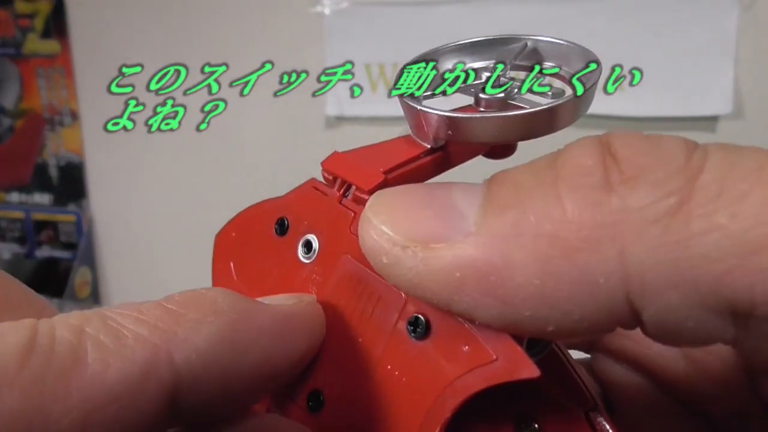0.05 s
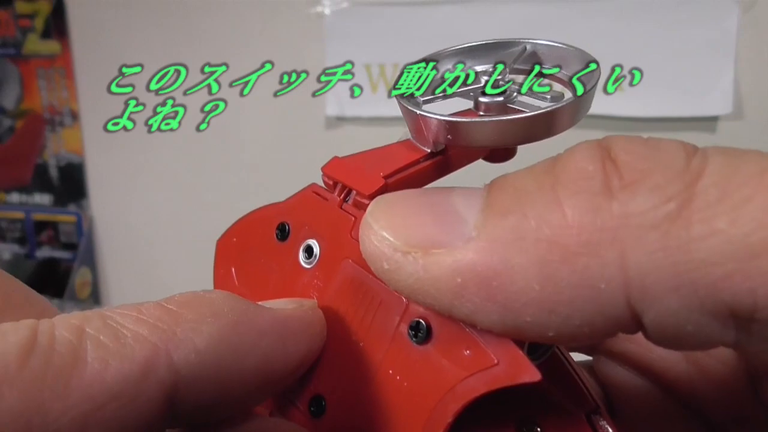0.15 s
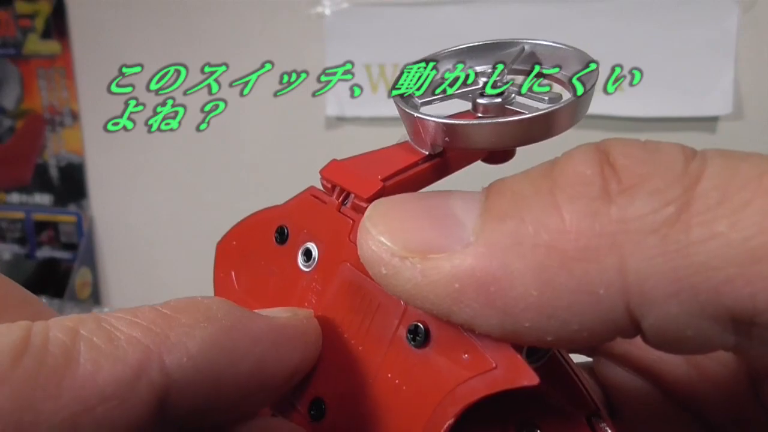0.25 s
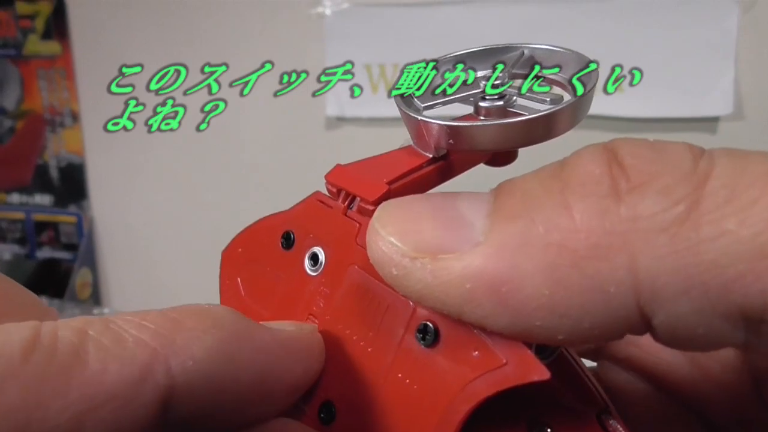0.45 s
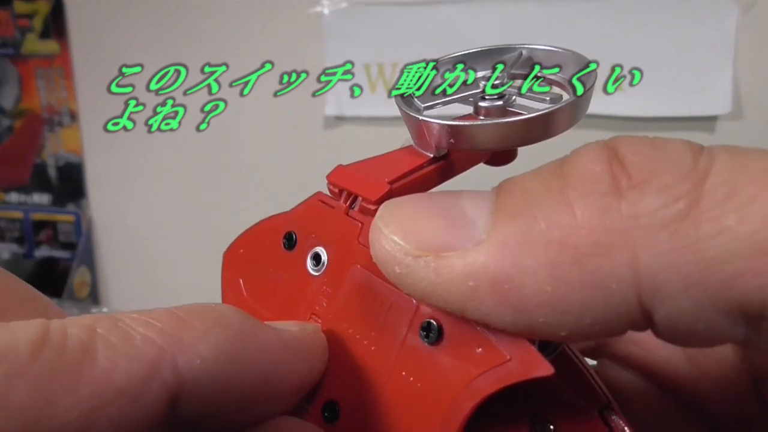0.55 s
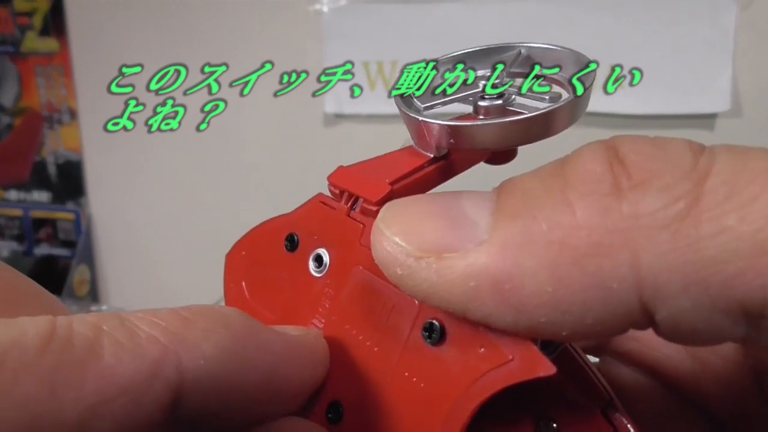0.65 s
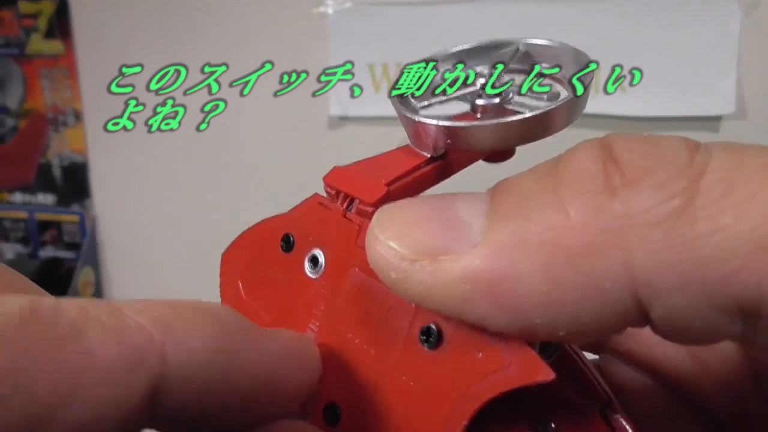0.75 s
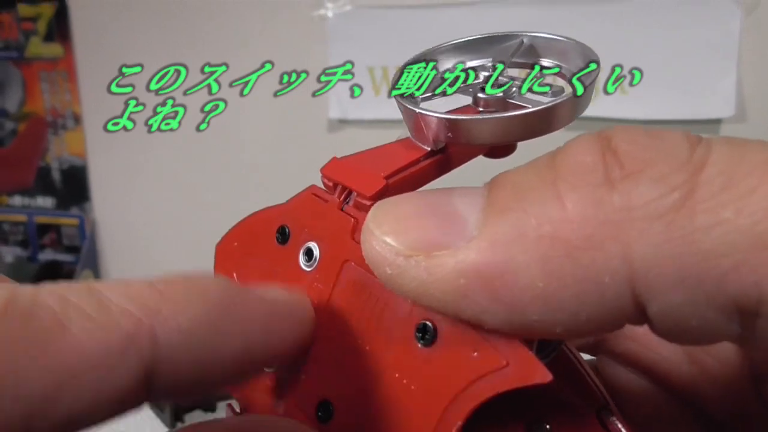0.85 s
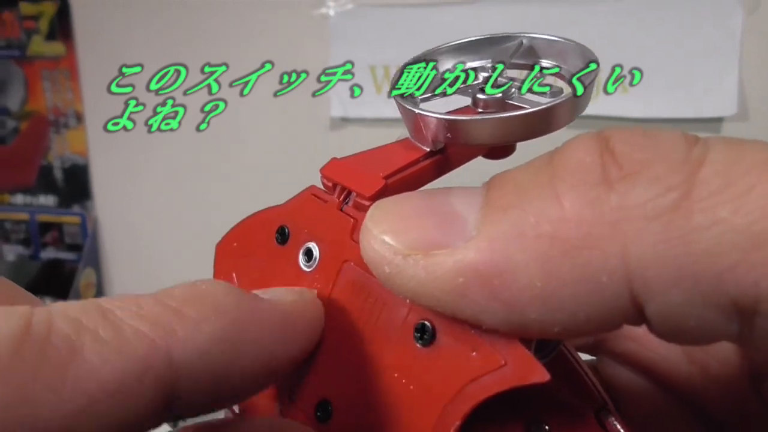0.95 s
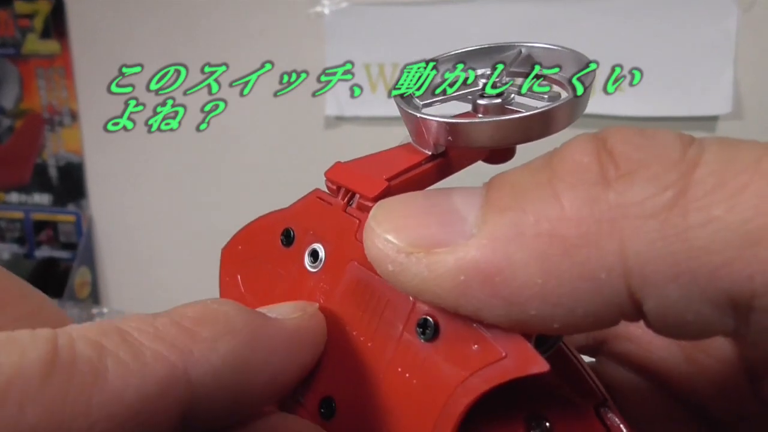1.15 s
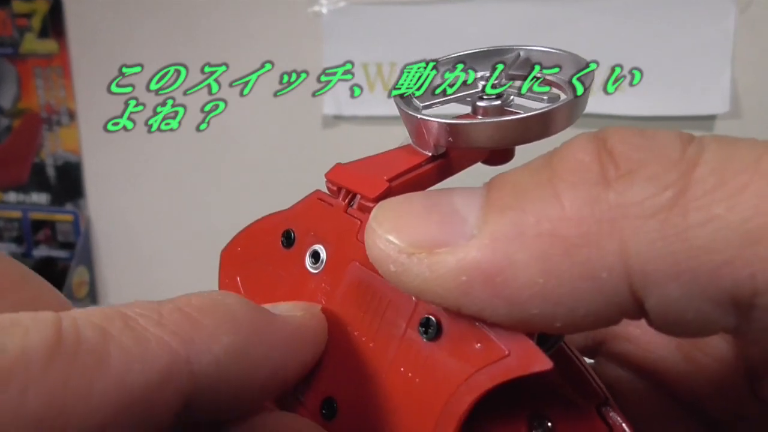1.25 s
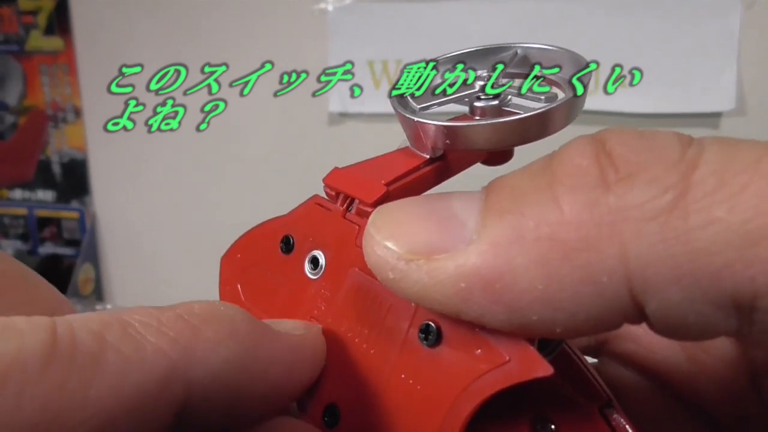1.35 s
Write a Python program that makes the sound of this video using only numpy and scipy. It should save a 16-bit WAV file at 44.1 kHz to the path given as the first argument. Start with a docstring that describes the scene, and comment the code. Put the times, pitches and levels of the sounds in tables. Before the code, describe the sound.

A stiff plastic toy switch ticks and scrapes under fingers, then snaps over loudly.

```python
"""Fingers work a stiff switch on a small hollow plastic toy, close by, over a faint fan-like hum.
A finger scrapes, and the switch sticks and slips in runs of dry ticks; each slip rings the shell
and jolts the held toy. A loose part knocks faintly. The switch snaps over twice, the second time
much louder. Light scrapes, two small knocks and a few last ticks follow in the quiet room."""
import sys
import numpy as np
from scipy import signal
from scipy.fft import rfft, irfft, next_fast_len
from scipy.io import wavfile
from scipy.ndimage import uniform_filter1d, minimum_filter1d, map_coordinates

SR = 44100
rng = np.random.default_rng(int(sys.argv[2]) if len(sys.argv) > 2 else 0)


def persist_wave(psi):
    """Save psi, clipped to +-1, as 16-bit WAV."""
    counts = np.round(np.clip(psi, -1, 1) * 32767).astype(np.int16)
    wavfile.write(sys.argv[1], SR, np.atleast_2d(counts).T)


N = 61739
ATTACK_S, HOLLOW_DB = .00012, -36


def amp(db):
    return 10 ** (np.asarray(db) / 20)


def unit_rms(x):
    return x / np.sqrt(np.mean(x ** 2) + 1e-20)


def curve_at(points, hz):
    """Interpolate (freq_hz, value) points on a log frequency axis."""
    freqs, values = np.transpose(points)
    return np.interp(np.log(hz + 1), np.log(freqs + 1), values)


def filtered(x, response):
    """Zero-phase filter with gain response(hz)."""
    n = x.shape[-1]
    size = next_fast_len(n + 2048)
    return irfft(rfft(x, size) * response(np.fft.rfftfreq(size, 1 / SR)), size)[..., :n]


def lowpass(x, edge_hz, steepness):
    return filtered(x, lambda hz: 1 / (1 + (hz / edge_hz) ** steepness))


def noise(spectrum, correlation, size):
    """Coloured stereo noise, rms 1, with a left-right correlation curve."""
    def response(hz):
        angle = np.arccos(np.clip(curve_at(correlation, hz), -1, 1)) / 2
        return amp(curve_at(spectrum, hz)) * [np.cos(angle), np.sin(angle)]
    mid, side = filtered(rng.standard_normal((2, size)), response)
    return unit_rms(np.array([mid + side, mid - side]))


def pan(left_over_right_db):
    return amp([[left_over_right_db / 2], [-left_over_right_db / 2]])


def add(track, start_s, sound):
    part = track[:, round(start_s * SR):][:, :sound.shape[-1]]
    part += sound[..., :part.shape[1]]


def ring(modes, t, detune=.008, scatter_db=1.5, stereo_rad=.25):
    """Damped stereo modes, struck a little differently each time."""
    hz, db, t60_s = np.transpose(modes)[:, :, None]
    tuning, strength, start_phase, skew = rng.standard_normal((4, len(modes), 1))
    phase = 2 * np.pi * hz * (1 + detune * tuning) * t + start_phase
    decay = amp(db + scatter_db * strength - 60 * t / t60_s)
    return np.array([(decay * np.sin(phase + side * stereo_rad * skew)).sum(0) for side in (1, -1)])


# Room air spectrum: freq_hz, gain_db
AIR_SPECTRUM = [(24, -64), (40, 4.5), (354, -0.5), (663, -5.5), (918, -5.5), (1590, -15.5), (1900, -22.5),
                (3140, -27.5), (4340, -25), (6330, -29.5), (9450, -22.5), (14500, -27.5), (16000, -60)]
# Room air stereo image: freq_hz, correlation
AIR_CORRELATION = [(60, 0.7), (1000, 0.05), (12000, 0.063)]
# Hum lines: pitch_hz, level_db
HUM_LINES = [(121, -72.5), (301, -80.5), (360.7, -67), (893.6, -74.5)]


def background(air_db=-59.5, drift_per_s=6):
    """Room air and a slightly unsteady fan-like hum."""
    t = np.arange(N) / SR
    hum = np.zeros(N)
    for hz, db in HUM_LINES:
        drift_rad = .5 * map_coordinates(rng.standard_normal(16), [t * drift_per_s])
        hum += amp(db) * np.sqrt(2) * np.sin(2 * np.pi * hz * t + drift_rad)
    return amp(air_db) * noise(AIR_SPECTRUM, AIR_CORRELATION, N) + hum


# Finger friction spectrum: freq_hz, gain_db
SCRAPE_SPECTRUM = [(160, 5), (700, -8), (2400, -18.5), (3700, -16.5), (4600, -2), (6100, -19), (8000, -5),
                   (12000, -10), (15500, -25)]
# Finger strokes: start_s, length_s, level_db
STROKES = [(0.108, 0.059, -65), (0.3, 0.034, -49.5), (0.419, 0.13, -73), (0.489, 0.017, -51),
           (0.717, 0.057, -59), (0.879, 0.14, -51.5), (1.0248, 0.031, -50.5), (1.143, 0.027, -52),
           (1.239, 0.014, -57)]


def scrapes(grains_per_s=1300, fade_db=11.5):
    """Dense tiny slips under a finger, coloured by the shell; each stroke eases off."""
    out, t = np.zeros((2, N)), np.arange(N) / SR
    grains = (rng.random(N) < grains_per_s / SR) * np.exp(.4 * rng.standard_normal(N))
    stereo_grains = grains * (1 + .5 * rng.standard_normal((2, N)))
    hiss = .1 * rng.standard_normal((2, N))
    rub = filtered(stereo_grains + hiss, lambda hz: amp(curve_at(SCRAPE_SPECTRUM, hz)) * hz / (hz + 150))
    for start_s, length_s, level_db in STROKES:
        stroke = rub[:, (t >= start_s) & (t < start_s + length_s)]
        size = stroke.shape[1]
        easing = amp(-fade_db * np.linspace(0, 1, size)) * signal.windows.tukey(size, .35)
        add(out, start_s, amp(level_db) * unit_rms(stroke) * easing)
    return out


def add_jolt(track, click_s, level_db, hz, t, lead_s=.00062, rise_s=.001, t60_cycles=.96):
    """The whole toy kicks once, just ahead of a click, damped by the fingers."""
    swing = -np.sin(2 * np.pi * hz * t) * amp(-60 * t * hz / t60_cycles)
    swing *= 1 - np.exp(-t / rise_s)
    add(track, click_s - lead_s, amp(level_db) * pan(9.5) * swing / np.abs(swing).max())


# Crack spectrum: freq_hz, gain_db
CRACK_SPECTRUM = [(500, 2), (1200, -13.5), (3500, -19.5), (4700, 0.5), (6100, -15), (7200, -7), (9500, -5),
                  (16000, -24)]


def crack(t, t60_s=.0095):
    """Short rough burst of plastic letting go."""
    return noise(CRACK_SPECTRUM, correlation=[(1000, .55)], size=len(t)) * amp(-60 * t / t60_s)


# Shell modes: pitch_hz, gain_db, t60_s
SHELL_MODES = [(2246, -22, 0.021), (3407, -9, 0.013), (4160, -15.5, 0.032), (7144, -1, 0.01),
               (8000, 5, 0.0047), (9080, 7, 0.0029), (10430, 2, 0.0046), (11890, 8.5, 0.0017),
               (13170, -6, 0.0031)]


def click(tooth_hz, low_db, top_db, t, tooth_db=-1.5, tooth_t60_s=.0093, crack_db=-2.5):
    """Tooth and shell ring over a crack; the contact point weights the low and top bands."""
    modes = SHELL_MODES + [(tooth_hz, tooth_db, tooth_t60_s)]
    strike = unit_rms(ring(modes, t)) + amp(crack_db) * unit_rms(crack(t))
    strike *= 1 - np.exp(-t / ATTACK_S)
    low = lowpass(strike, edge_hz=6200, steepness=16)
    top = strike - lowpass(strike, edge_hz=10900, steepness=16)
    middle = strike - low - top
    bands = amp(low_db) * unit_rms(low) + unit_rms(middle) + amp(top_db) * pan(-5) * unit_rms(top)
    return bands * np.sqrt(.0025 / t[-1])  # middle band: energy of 2.5 ms at rms 1


# Cavity modes: pitch_hz, gain_db, t60_s
HOLLOW_MODES = [(504, -7, 0.0028), (693, -16, 0.008), (1350, 17, 0.0026)]


def hollow(t):
    """Air inside the toy, pushed by a jolt."""
    return -sum(amp(db - 60 * t / t60_s) * np.sin(2 * np.pi * hz * t) for hz, db, t60_s in HOLLOW_MODES)


# Switch slips: start_s, level_db, low_re_middle_db, top_re_middle_db, pan_db, jolt_db, tooth_hz
SLIPS = [(0.115, -57, 0.5, -9, -2, -46, 4660), (.138, -49, -4, -10, -1, -48, 4700),
         (0.1476, -47.5, -5.5, -15, -6, -51.5, 4860), (0.1621, -44, -4, -18, -2, -41, 4180),
         (0.176, -51, -3, -13, 0, -45, 4140), (0.1905, -49.5, -0.5, -15, -3.5, -44, 5260),
         (0.2473, -34, -14.5, -8, -1, -42.5, 5000), (0.2689, -52, -2, -10, -3.5, -55, 4100),
         (.2993, -44.5, 0, -11, -1, -46, 4440), (0.3102, -51.5, -5.5, -8, -19, -29.5, 4540),
         (0.3152, -44, 0.5, -1, 6.5, -79, 4810), (0.3205, -49, -1.5, -19, -6, -42.5, 3980),
         (.47, -62.5, -3, -8, -14, -40.5, 4200), (0.48, -30, -14.5, -14, -2, -44, 4300),
         (0.4827, -45, 7, -3, -1, -31, 4220), (.496, -38.5, -5.5, -14, -1, -34, 4200),
         (.5124, -38, -6.5, -26, 3, -40, 4270), (0.5392, -32.5, -8.5, -22, -1, -43, 5170),
         (0.597, -40.5, -4, -8, -3.5, -54, 4060), (.613, -40.5, -5.5, -13, 1.5, -50, 4600),
         (0.6284, -61, 10, -12, -3, -47, 3700), (0.6371, -43, -2, -3, -2.5, -55.5, 4400),
         (0.7004, -44, -5, -2.5, 2, -48, 4970), (0.7157, -46.5, -2.5, 5.5, -7, -50.5, 4650),
         (0.8313, -51.5, 1.5, -17, -1, -56.5, 4000), (1.2315, -44, -0.5, -8.5, -3, -35.5, 4800),
         (1.3725, -63, 1, -2, 0, -41, 4400), (1.3852, -66, 11.5, -18, -3, -42.5, 3680),
         (1.3963, -43, -9.5, -13, 2, -38, 4540)]


def slips(t, jolt_ref_hz=328, jolt_ref_db=-47.5, db_per_octave=34):
    """Stick-slip ticks: each jolts the toy, clicks and sounds the hollow. Bigger jolts swing slower."""
    out = np.zeros((2, N))
    for start_s, level_db, low_db, top_db, pan_db, jolt_db, tooth_hz in SLIPS:
        jolt_hz = jolt_ref_hz * 2 ** ((jolt_ref_db - jolt_db) / db_per_octave)
        add_jolt(out, start_s, jolt_db, jolt_hz, t)
        tick = pan(pan_db) * click(tooth_hz, low_db, top_db, t) + amp(HOLLOW_DB) * hollow(t)
        add(out, start_s, amp(level_db) * tick)
    return out


# Loose part modes: pitch_hz, gain_db, t60_s
LOOSE_PART_MODES = [(977, 8, 0.021), (1536, 0.5, 0.04), (2050, 7.5, 0.014), (3620, 3, 0.01),
                    (5080, 1.5, 0.026)]
# Loose part hits: start_s, level_db
LOOSE_PART_HITS = [(.4965, -59.5), (1.2127, -51.5), (1.3965, -53.5)]


def knocks(t):
    """A loose part knocks and rings briefly."""
    out = np.zeros((2, N))
    for start_s, level_db in LOOSE_PART_HITS:
        add(out, start_s, amp(level_db) * ring(LOOSE_PART_MODES, t) * (1 - np.exp(-t / ATTACK_S)))
    return out


# Switch catch modes: pitch_hz, t60_s
CATCH_MODES = [(4750, 0.0058), (7150, 0.0045), (8400, .005), (9600, 0.0039), (12800, 0.0024)]
# Switch snaps: start_s, mode_levels_db, crack_db, jolt_db, jolt_hz, hollow_db
SWITCH_SNAPS = [(0.7183, (-17, -4.5, -13, -9.5, -16), -21, -32.5, 187, -81),
                (0.8964, (-2.5, 0.5, -24, 5.5, 4), -4, -21, 272, -32.5)]


def snaps(t, attack_s=.0003):
    """The switch snaps over: its catch rings and cracks, the toy jolts, the hollow sounds."""
    out = np.zeros((2, N))
    for start_s, mode_levels_db, crack_db, jolt_db, jolt_hz, hollow_db in SWITCH_SNAPS:
        modes = [(hz, db, t60_s) for (hz, t60_s), db in zip(CATCH_MODES, mode_levels_db)]
        strike = ring(modes, t) + amp(crack_db) * crack(t)
        strike *= (1 - np.exp(-t / attack_s)) ** 2
        add_jolt(out, start_s, jolt_db, jolt_hz, t)
        add(out, start_s, strike + amp(hollow_db) * hollow(t))
    return out


# Room decay: freq_hz, t60_s
ROOM_DECAY = [(5000, 0.13), (15000, 0.067)]


def room(x, near_db=-24, near_t60_s=.03, tail_db=-30, delay_samples=88):
    """Quick reflections from hands and wall, then a faint tail."""
    hz, frame_s, spectra = signal.stft(rng.standard_normal((2, SR // 2)), SR, nperseg=256)
    spectra *= amp(-60 * frame_s / curve_at(ROOM_DECAY, hz)[:, None])
    tail = signal.istft(spectra, SR, nperseg=256)[1]
    t = np.arange(tail.shape[1]) / SR
    near = rng.standard_normal(tail.shape) * amp(-60 * t / near_t60_s)
    impulse = amp(near_db) * near / np.linalg.norm(near[0])
    impulse += amp(tail_db) * tail / np.linalg.norm(tail[0])
    return signal.fftconvolve(x, np.pad(impulse, ((0, 0), (delay_samples, 0))), axes=1)[:, :N]


def scene():
    """Toy, room reflections and background."""
    strike_t = np.arange(2048) / SR
    toy = slips(strike_t) + snaps(strike_t) + knocks(strike_t) + scrapes()
    return toy + room(toy) + background()


def record(dry, low_cut_hz=109.5, limit_db=-9.5, recover_s=.087):
    """Bass cut, a limiter that ducks at the loudest snap and recovers, then a steep top cut."""
    x = signal.sosfilt(signal.butter(2, low_cut_hz, "high", fs=SR, output="sos"), dry)
    excess_nepers = np.maximum(np.log(np.abs(x).max(0) / amp(limit_db) + 1e-9), 0)
    release = np.exp(-np.arange(N) / SR / recover_s)
    duck_nepers = np.maximum.accumulate(excess_nepers / release) * release
    gain = uniform_filter1d(minimum_filter1d(np.exp(-duck_nepers), size=65), size=65)
    return lowpass(x * gain, edge_hz=16700, steepness=120)


dry = scene()
out = record(dry)
persist_wave(out)
```